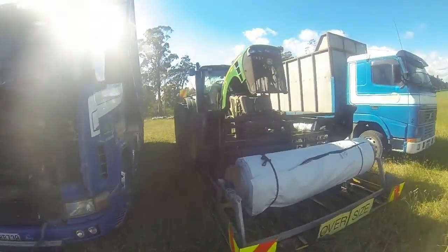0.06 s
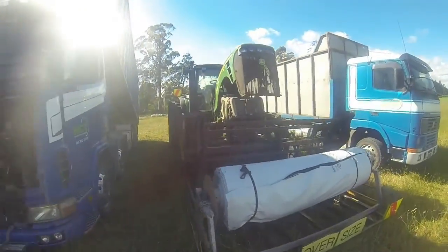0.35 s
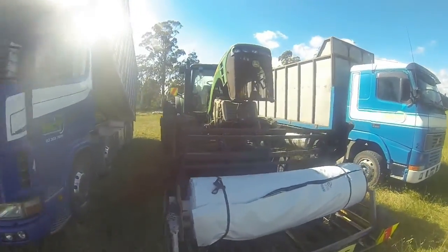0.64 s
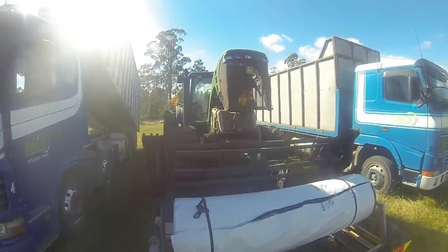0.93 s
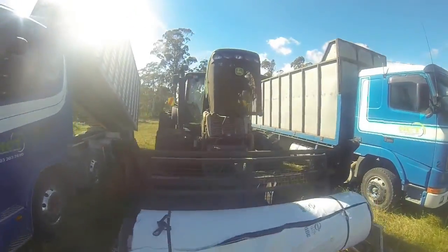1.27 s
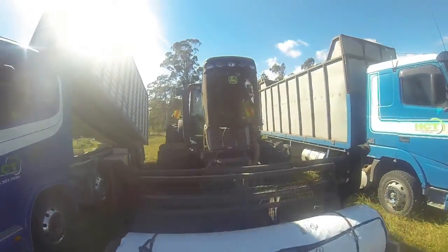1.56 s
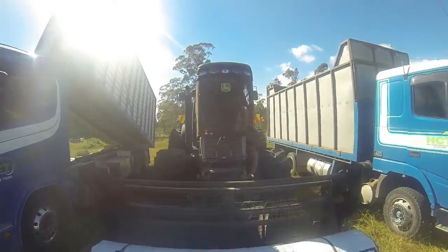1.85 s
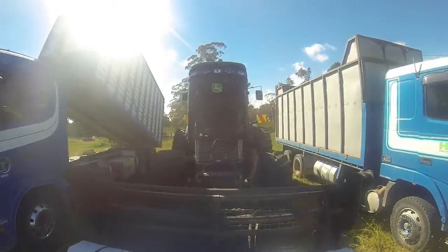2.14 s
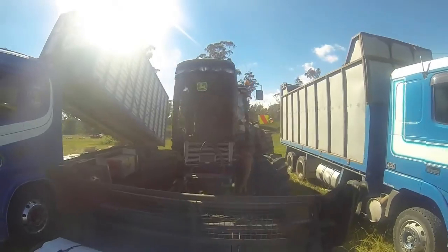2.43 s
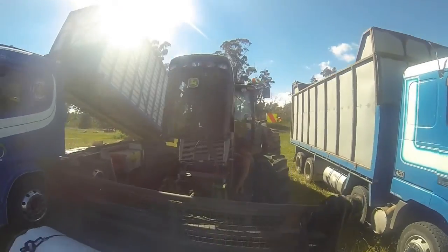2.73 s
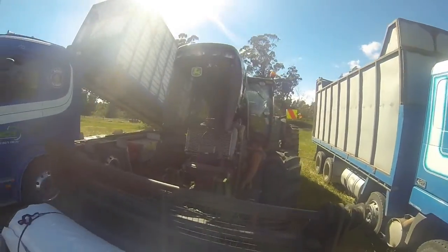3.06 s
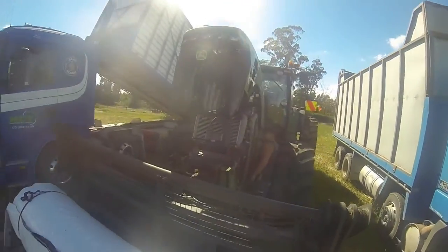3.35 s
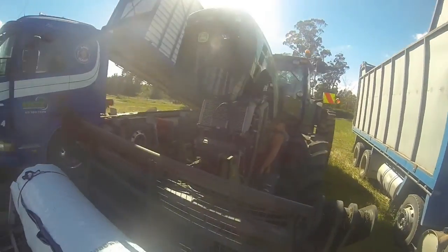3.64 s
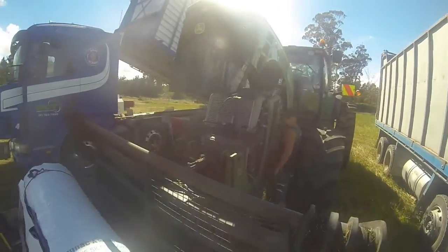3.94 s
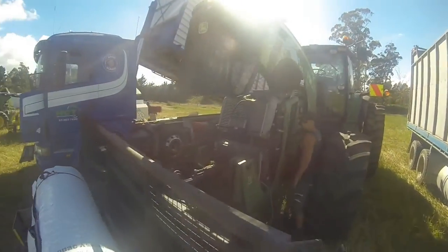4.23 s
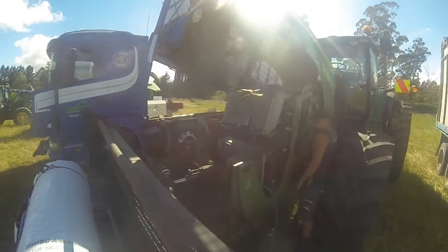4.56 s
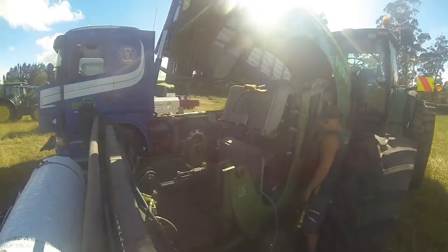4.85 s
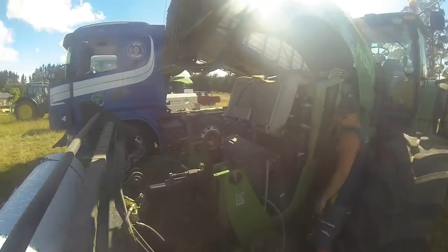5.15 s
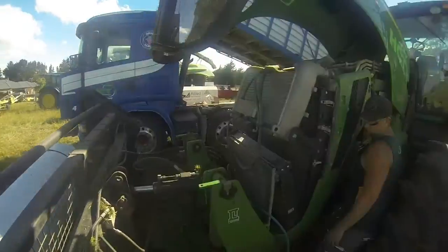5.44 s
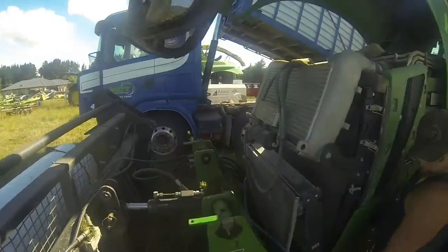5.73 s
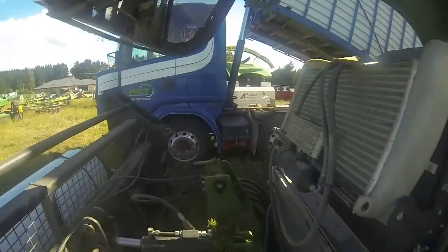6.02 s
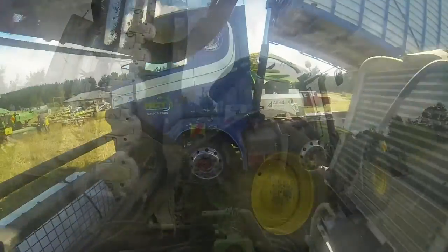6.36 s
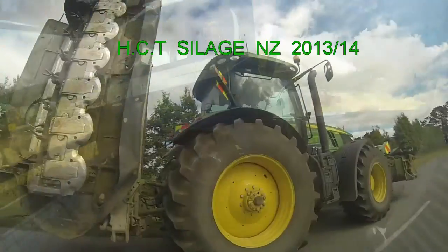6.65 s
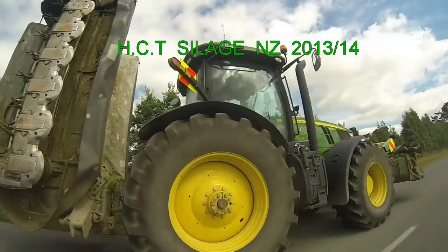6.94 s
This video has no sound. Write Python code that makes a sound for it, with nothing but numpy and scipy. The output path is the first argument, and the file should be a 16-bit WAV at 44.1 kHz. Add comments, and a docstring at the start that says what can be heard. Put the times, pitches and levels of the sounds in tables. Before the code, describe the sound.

Farm machinery idles with a high, rattling whine and low rumble, growing more distant as the microphone moves past, then fading out.

```python
"""An eight-cylinder diesel idles at 1100 rpm, its knocks ringing a metal panel in a rattling whine.
The whine recedes as a camera is carried between parked farm machines, past a second, humming
diesel and through a deep rumble. The camera is bumped and its electronics whistle faintly. Loose
metal ticks and squeaks, a fan and an engine bay hiss, a valve puffs air once, and the sound fades out."""
import sys
import numpy as np
from scipy import signal
from scipy.fft import rfft, irfft, next_fast_len
from scipy.io import wavfile
from scipy.ndimage import uniform_filter1d, map_coordinates

SR = 44100
rng = np.random.default_rng(int(sys.argv[2]) if len(sys.argv) > 2 else 0)


def materialize(psi):
    """Save the field psi as 16-bit PCM at rate SR to the path in sys.argv[1].

    A 1-D psi becomes a single channel; in a 2-D psi each row is a channel.
    """
    bounded = np.clip(np.atleast_2d(psi).T, -1, 1)
    quanta = np.round(bounded * 32767).astype(np.int16)
    wavfile.write(sys.argv[1], SR, quanta)


N = 312669

CYCLE_HZ = 9.187  # every cylinder of the main diesel fires once per cycle

# Tone colours: how strong a sound is from low to high. Columns: pitch_hz, gain_db
YARD_COLOUR = [(200, -4), (480, 0), (535, 4), (620, -0.5), (1000, 1.5), (2250, 0.5), (2600, 2), (3500, -3),
               (4650, -11), (5250, -4.5), (5850, -19), (6400, -11.5), (6800, -19), (9500, -26.5),
               (12500, -30.5), (14500, -49)]  # distant machines
FAN_COLOUR = [(3000, -18.5), (6000, 3), (7500, 4.5), (8500, -1), (9800, -12), (10450, 3), (10750, -5.5),
              (11000, -4), (11800, -14), (14000, -15), (14500, -27.5)]  # cooling fan
BAY_COLOUR = [(1500, -12), (2500, 1), (3400, 2.5), (4600, -14), (5300, -7.5), (6000, -22), (6420, -11),
              (6800, -21.5), (10000, -32.5)]  # open engine bay
PUFF_COLOUR = [(1200, -27), (2600, 1), (3600, 8), (4600, -8), (5250, 1.5), (5900, -9), (6600, -8),
               (7300, 0), (7900, -11), (8600, -13.5), (9500, -22), (14000, -30)]  # escaping air
RUMBLE_COLOUR = [(4, -26.5), (11, -9), (20, 8.5), (26, 8), (37, -7), (50, 3.5), (61, -3), (74, -15.5),
                 (92, -28), (135, -26.5), (180, -36), (400, -80)]  # churning air
RATTLE_COLOUR = [(500, -47.5), (950, -28), (1180, -16), (1350, -9.5), (1405, -4), (1450, -3), (1530, -1.5),
                 (1590, -3.5), (1700, -12.5), (1820, -14.5), (1960, -14.5), (2080, -20.5), (2190, -42),
                 (3000, -62)]  # main diesel's broad rattle
BRIGHT_COLOUR = [(1500, -20.5), (2250, -3.5), (2550, 3.5), (3000, 0), (3700, -1.5), (4180, 1),
                 (4650, -20.5), (5250, -3.5), (5650, -19), (5950, -14), (6500, -19.5), (8000, -24),
                 (9700, -40.5), (14000, -60)]  # its bright metal
BLOCK_COLOUR = [(60, -12), (100, 5.5), (150, 10), (200, 4.5), (290, 7.5), (400, 1), (480, 1), (680, 1.5),
                (830, 7.5), (1000, -1), (1400, -21.5), (2500, -54.5)]  # its dull engine block

# An air valve cracks, then opens: start_s, level_db
PUFFS = [(4.37, -59), (4.425, -58.5), (4.441, -48)]
# Ticks of a loose metal part: start_s, relative_db
TICKS = [(2.195, -33), (2.262, -35), (2.306, -33), (2.415, -34)]
# The notes that part rings with (ring_s is the time to fall 60 dB): pitch_hz, gain_db, ring_s
TICK_NOTES = [(3930, 6.5, 0.03), (4260, 6, 0.038), (5300, -4, .04)]
# Squeaks of a joint: start_s, length_s, start_hz, end_hz, level_db
SQUEAKS = [(2.222, 0.045, 2620, 2670, -40.5), (5.769, 0.042, 3570, 3460, -51)]
# Soft jolts of the camera: start_s, relative_db, pitch_hz, swell_s
JOLTS = [(.612, -13.5, 49.7, 0.02), (1.02, -5, 53.2, 0.013), (1.156, -23, 125, 0.016),
         (1.587, -12, 46.1, 0.028), (2.031, -17, 48.3, 0.028), (2.261, -15.5, 70.6, 0.011),
         (2.458, -6.5, 53.3, 0.017), (2.458, -20.5, 129, 0.016), (2.835, -12.5, 51.8, 0.023),
         (3.356, -9, 50.5, 0.024), (3.79, -11.5, 29.2, 0.047), (4.486, -18, 51, 0.012),
         (4.875, -27.5, 124, 0.025)]
# Taps on the camera's case: start_s, peak_db, hardness_db_per_octave
TAPS = [(0.906, -26, 1), (1.16, -36, -11.5), (1.386, -29, 4.5), (1.557, -22.5, -1), (2.101, -36, -6),
        (2.408, -31, 12), (2.464, -31.5, -7), (3.356, -31, -7), (5.96, -25, .8)]
# The notes the case rings with: pitch_hz, gain_db, ring_s
CASE_NOTES = [(175, -8, 0.044), (264, -1, 0.055), (325, -7.5, 0.054), (403, -5, 0.045), (530, -7.5, 0.022),
              (640, -8, 0.037), (760, -11.5, .03)]
# The second diesel's hum: multiple_of_firing_rate, gain_db
HUM_TONES = [(1, 9.5), (3, 4), (4, -4), (5, -3), (6, -12), (8.5, -6.5)]

# The main diesel's ringing drops as the camera moves away: time_s, relative_db
WALK_AWAY = [(0.15, -25.5), (1.12, -26), (1.18, -27), (1.47, -26), (4.09, -34.5), (4.99, -34), (5.0, -35.5)]
# Its cylinders in firing order, each in clearest view at one time: knock_db, slap_db, clatter_db, view_s
CYLINDERS = [(3.5, -5, -3.5, 5.2), (7, 1, 1.5, 0.32), (-4.5, -2, 2.5, 4.2), (6.5, -5.5, -2, 3.2),
             (3, -12, 2, 3.1), (4, -13, -0.5, 3.7), (4.5, -8, 0, 2.3), (2.5, 0, 1.5, 3)]
# Resonances (favourite pitches) of the panel each firing strikes: pitch_hz, width_hz, gain_db
PANEL_RESONANCES = [(1315, 81, -4), (1432, 109, 0.5), (1535, 85.5, 0), (1860, 250, -20)]
# The engine's sharpest resonances: pitch_hz, width_hz, gain_db
WHINE_RESONANCES = [(1460, 48, -2), (1522, 67, -0.5), (1590, 36.3, -2)]
# Tones of the engine block: multiple_of_cycle_rate, gain_db
BLOCK_TONES = [(8, 4.5), (11, -5.5), (12, -9), (17, -13.5), (24, -13.5), (80, -21), (96, -17.5),
               (104, -16.5)]


def amp(db):
    """Turn decibels into a volume factor."""
    return 10 ** (np.asarray(db) / 20)


def unit(x):
    """Scale x to an average strength (rms) of 1."""
    return x / np.sqrt(np.mean(x ** 2) + 1e-20)


def clock():
    """The time of each sample in seconds."""
    return np.arange(N) / SR


def passing(at_s, over_s):
    """A soft step from 0 to 1 as the walk passes a point."""
    return .5 + .5 * np.tanh((clock() - at_s) / (2 * over_s))


def pass_by(nearest_s, near_for_s):
    """Level in dB when walking past: 0 at the nearest point, -3 at near_for_s before and after."""
    return -10 * np.log10(1 + ((clock() - nearest_s) / near_for_s) ** 2)


def wobble(rate_hz):
    """A smooth curve through rate_hz random values a second."""
    return map_coordinates(rng.standard_normal(int(N * rate_hz / SR) + 4), [clock() * rate_hz])


def coloured(x, colour):
    """Filter x to a tone colour, at strength 1."""
    size = 2 * next_fast_len(N // 2 + SR // 2)
    hz, db = np.transpose(colour)
    curve_db = np.interp(np.log(np.fft.rfftfreq(size, 1 / SR) + 1), np.log(hz + 1), db)
    cepstrum = irfft(np.log(amp(curve_db)))
    # folding it in half makes the filter ring after a hit, never before
    cepstrum[1:size // 2] *= 2
    cepstrum[size // 2 + 1:] = 0
    return unit(irfft(rfft(x, size) * np.exp(rfft(cepstrum)))[:N])


def noise(colour):
    """Steady noise of the given colour."""
    return coloured(rng.standard_normal(N), colour)


def resonate(x, resonances, top_hz=3500):
    """Let x ring a set of resonances, muffled above top_hz, at strength 1."""
    size = next_fast_len(N + SR // 2)
    f = np.fft.rfftfreq(size, 1 / SR)
    response = sum((-1) ** k * amp(db) * 1j * f * width / (hz * hz - f * f + 1j * f * width)
                   for k, (hz, width, db) in enumerate(resonances))
    return unit(irfft(rfft(x, size) * response / (1 + 1j * f / top_hz) ** 2, size)[:N])


def camera_whistle(pitch_hz=12900, frame_hz=47.98, on_share=.44, level_db=-62.5):
    """The electronics whistle during part of every picture frame."""
    frame = clock() * frame_hz - .46
    phases = rng.uniform(0, 2 * np.pi, int(frame[-1]) + 2)
    phase = phases[np.floor(frame + 1 / 4).astype(int)]  # jumps while the whistle is off
    gate = uniform_filter1d((frame % 1 < on_share) * 1.0, SR // 1100)
    return amp(level_db) * gate * np.sin(2 * np.pi * pitch_hz * clock() + phase)


def in_bay():
    """Goes from 0 to 1 as the camera leans into an open engine bay."""
    return passing(at_s=5.38, over_s=.35)


def yard_hiss():
    """An engine bay's hiss comes near, distant machines blur together, a cooling fan is left behind."""
    bay = amp(-54) * in_bay() * noise(BAY_COLOUR)
    machines = amp(-53) * noise(YARD_COLOUR)
    fan = amp(-65.5 - 15 * passing(at_s=1.35, over_s=.22)) * noise(FAN_COLOUR)
    return bay + machines + fan


def air_valve(rise_s=0.0012, die_away_s=0.46):
    """Air escapes from a valve in one short puff."""
    loudness = np.zeros(N)
    for start_s, db in PUFFS:
        age = np.maximum(clock() - start_s, 0)
        loudness += amp(db - 60 * age / die_away_s) * (1 - np.exp(-age / rise_s))
    return loudness * noise(PUFF_COLOUR)


def loose_metal():
    """A loose part ticks a few times, and a joint gives two brief squeaks."""
    out, t = np.zeros(N + SR), np.arange(SR // 8) / SR
    for start_s, relative_db in TICKS:
        ring = sum(amp(db + rng.normal(0, 2.7) - 60 * t / ring_s) * np.sin(2 * np.pi * hz * t)
                   for hz, db, ring_s in TICK_NOTES)
        out[round(start_s * SR):][:len(t)] += amp(relative_db - 10) * ring * (1 - np.exp(-t / 0.00065))
    for start_s, length_s, start_hz, end_hz, db in SQUEAKS:
        progress = np.clip(t / length_s, 0, 1)
        hz = start_hz + (end_hz - start_hz) * progress + 45 * wobble(270)[:len(t)]
        tone = np.sin(2 * np.pi * np.cumsum(hz) / SR)
        out[round(start_s * SR):][:len(t)] += amp(db) * np.sin(np.pi * progress) * tone
    return out[:N]


def camera_bumps(scuff_s=0.049):
    """Jolts swing the camera at a low pitch; taps ring its hollow case, each with a short scuff."""
    out, t = np.zeros(N + SR), np.arange(SR // 3) / SR
    for start_s, db, hz, swell_s in JOLTS:
        swell = (t / swell_s * np.exp(1 - t / swell_s)) ** 2
        out[round(start_s * SR):][:len(t)] -= amp(db - 4.5) * swell * np.sin(2 * np.pi * hz * t)
    for start_s, peak_db, hardness in TAPS:
        force = rng.standard_normal(len(t)) * amp(-60 * t / scuff_s)
        force[0] = np.linalg.norm(force)  # the first hit has as much energy as the scuff
        ring = sum(amp(db + hardness * np.log2(hz) - 60 * t / ring_s) * np.sin(2 * np.pi * hz * t)
                   for hz, db, ring_s in CASE_NOTES)
        tap = signal.fftconvolve(force, ring)[:len(t)]
        out[round(start_s * SR):][:len(t)] += amp(peak_db) * tap / np.abs(tap).max()
    return out[:N]


def rumble(throb_hz=24.8):
    """Deep churning air around the machines, with a low throb in it."""
    churn = noise(RUMBLE_COLOUR)
    churn /= np.sqrt(np.abs(uniform_filter1d(churn ** 2, SR // 6)) + 0.13)  # evens out its strength
    throb = amp(-6 + 1.5 * wobble(1.2)) * np.sin(2 * np.pi * throb_hz * clock() + 0.8 * wobble(3.5))
    level_db = -22.5 + pass_by(nearest_s=2.7, near_for_s=3.2) + 1.3 * wobble(4.9)
    return amp(level_db) * (churn + throb)


def second_diesel(firing_hz=62.9):
    """The walk passes a smoother engine whose exhaust booms and hums at a slightly unsteady speed."""
    away_db = pass_by(nearest_s=1.67, near_for_s=1.7)
    phase = 2 * np.pi * np.cumsum(firing_hz + 0.14 * wobble(3)) / SR
    boom = amp(-44.5 + away_db + 2.5 * wobble(14)) * np.sin(2 * phase + 0.52 * wobble(34))
    boom *= passing(at_s=.6, over_s=.31)  # the exhaust comes out from behind a lorry
    hum = sum(amp(db + 1.5 * wobble(2)) * np.sin(k * phase + rng.uniform(0, 2 * np.pi))
              for k, db in HUM_TONES)
    return np.sqrt(2) * (boom + amp(-58 + 0.93 * away_db) * hum)


def cycle_noise(repeat_share, drift_hz):
    """Noise that partly repeats every engine cycle; the pattern drifts as the listener moves."""
    fresh = rng.standard_normal(N)
    period = round(SR / CYCLE_HZ)
    place = clock() * drift_hz
    patterns = rng.standard_normal((int(place[-1]) + 2, period))
    row, col = place.astype(int), np.arange(N) % period
    blend = place % 1 * np.pi / 2
    repeating = patterns[row, col] * np.cos(blend) + patterns[row + 1, col] * np.sin(blend)
    return np.sqrt(repeat_share) * repeating + np.sqrt(1 - repeat_share) * fresh


def engine_strokes(scatter_db=1.2, decay_s=.0024, delay_s=.005, jitter_s=.0002,
                   in_view_s=1.2, hidden_db=-6):
    """Loudness curves of the blows (firing knocks, piston slaps halfway between) and valve clatter."""
    knock_db, slap_db, clatter_db, view_s = np.transpose(CYLINDERS)
    count = len(CYLINDERS)
    firing = (clock() - delay_s + jitter_s * wobble(110)) * CYCLE_HZ * count  # rises by 1 per firing
    fired, slapped = np.floor(firing).astype(int), np.floor(firing - .5).astype(int)
    chance_db = scatter_db * rng.standard_normal((2, fired[-1] + 2))
    hidden = 1 - np.exp(-((clock() - view_s[fired % count]) / in_view_s) ** 2)
    decay = lambda phase: np.exp(-(phase % 1) / (CYCLE_HZ * count * decay_s))
    knock = amp(knock_db[fired % count] + hidden_db * hidden + chance_db[0, fired]) * decay(firing)
    slap = amp(slap_db[slapped % count] + chance_db[1, slapped]) * decay(firing - .5)
    beat = 1 - 0.78 * passing(at_s=4.3, over_s=.25)  # going behind the next machine blurs the beat
    clatter = amp(beat * np.interp(firing - .5, np.arange(count), clatter_db, period=count))
    return unit(knock + slap), unit(clatter)


def main_diesel():
    """Knocks and valve clatter shake the ringing panel, the bright metal and the dull block."""
    blows, clatter = engine_strokes()
    walk_db = np.interp(clock(), *np.transpose(WALK_AWAY)) - 2.5 * in_bay()
    away_db = walk_db - walk_db.max()
    # the steep pressure rise of each firing strikes the panel like a hammer
    hammer = np.maximum(np.diff(blows, prepend=blows[0]), 0)
    strike = resonate(hammer, PANEL_RESONANCES)
    # the clatter keeps the sharpest resonances singing between the blows
    whine = resonate(clatter * cycle_noise(repeat_share=0.42, drift_hz=1.37), WHINE_RESONANCES)
    shaking = np.hypot(amp(-5.5) * blows, amp(-3.5) * clatter)
    rattle = coloured(shaking * cycle_noise(repeat_share=0.73, drift_hz=1.317), RATTLE_COLOUR)
    rattle *= amp(0.16 * (walk_db - walk_db.mean()))  # falls away faster with distance
    ring = unit(amp(-8.5) * strike + amp(-4.2) * whine + rattle)
    uneven = (clatter + 0.2 * blows) * amp(0.55 * wobble(28))
    bright = coloured(uneven * cycle_noise(repeat_share=0.27, drift_hz=1.2), BRIGHT_COLOUR)
    block = coloured((1 + 0.2 * blows) * cycle_noise(repeat_share=0.5, drift_hz=1.09), BLOCK_COLOUR)
    for k, db in BLOCK_TONES:
        strength = np.sqrt(2) * amp(db + 3.5 * wobble(3.1))
        block += strength * np.sin(2 * np.pi * k * CYCLE_HZ * clock() + 0.35 * wobble(4.5))
    # distance takes most from the bright metal and least from the block
    return (amp(walk_db - 0.86) * ring
            + amp(-44 + 1.62 * away_db) * bright
            + amp(-46.5 + 0.81 * away_db) * block)


def scene():
    """All the sounds add up at one microphone."""
    machines = main_diesel() + second_diesel() + rumble()
    return (machines + camera_bumps() + loose_metal() + yard_hiss() + air_valve() + camera_whistle())[None]


def record(dry, fade_start_s=5.34, fade_end_s=6.81, floor_db=-75.5, top_hz=14500):
    """Fade smoothly to near silence and cut everything above top_hz."""
    gone = np.clip((clock() - fade_start_s) / (fade_end_s - fade_start_s), 0, 1)
    fade = np.cos(np.pi / 2 * gone) ** 2 + amp(floor_db)
    size = next_fast_len(N + SR // 2)
    kept = np.fft.rfftfreq(size, 1 / SR) < top_hz
    return irfft(rfft(dry * fade, size) * kept, size)[:, :N]


dry = scene()
out = record(dry)
materialize(out)
```